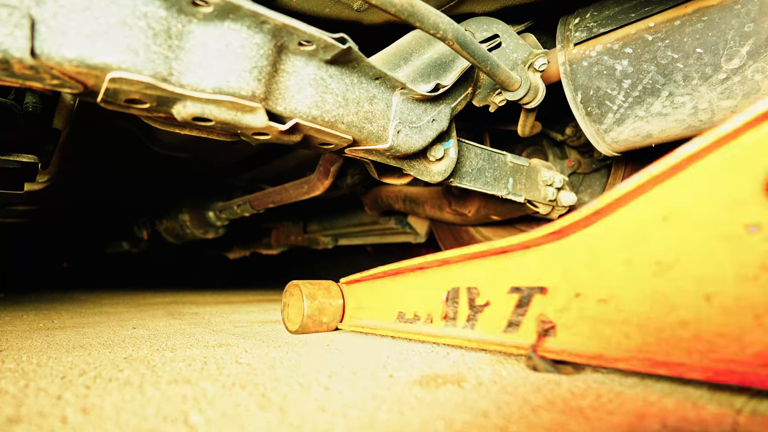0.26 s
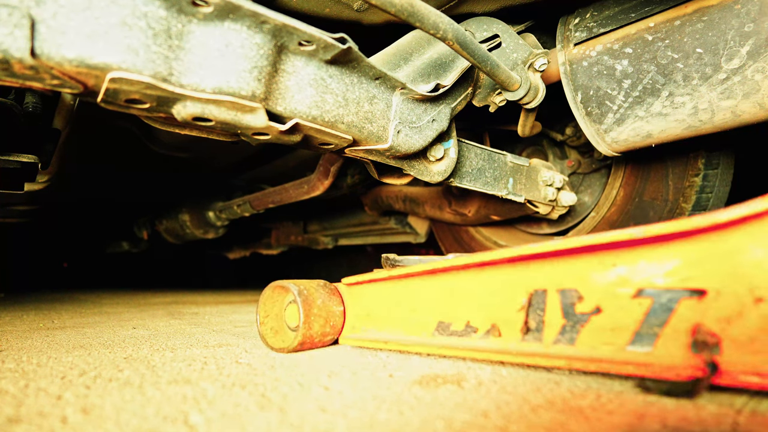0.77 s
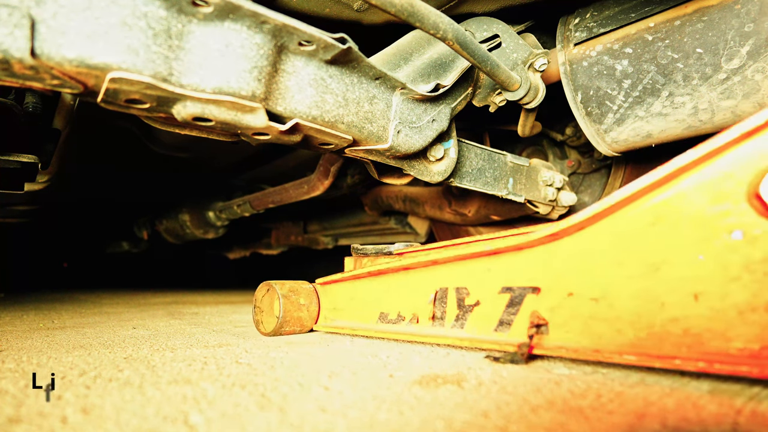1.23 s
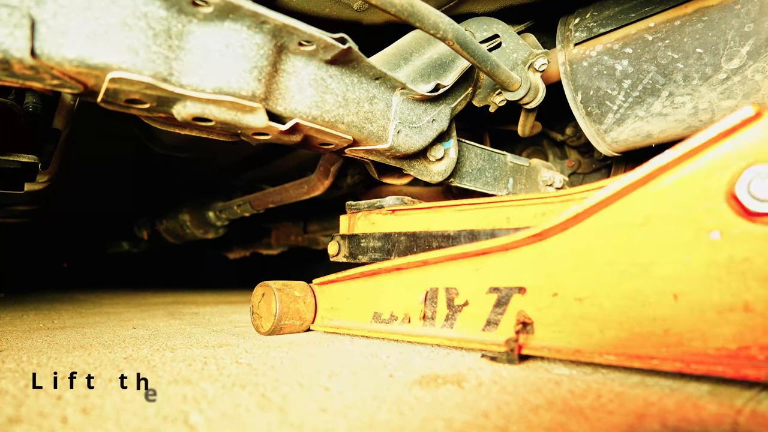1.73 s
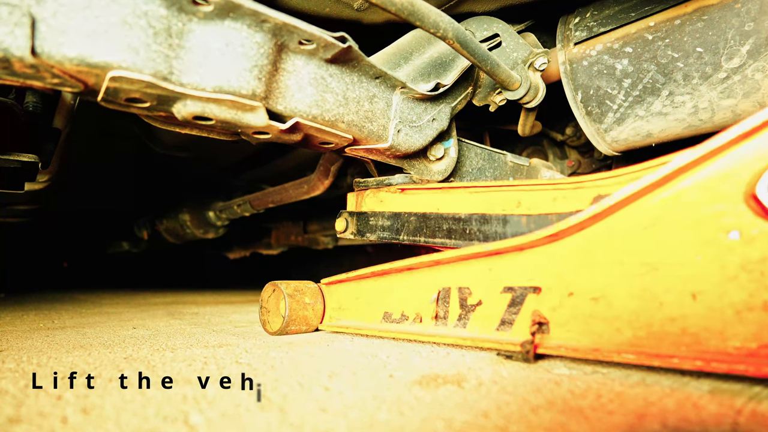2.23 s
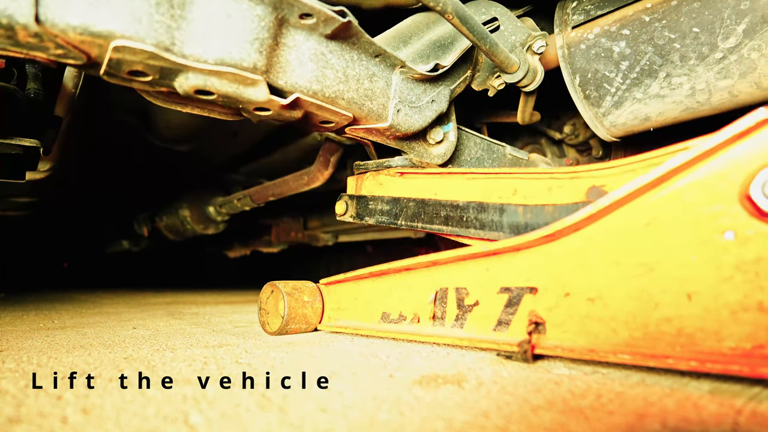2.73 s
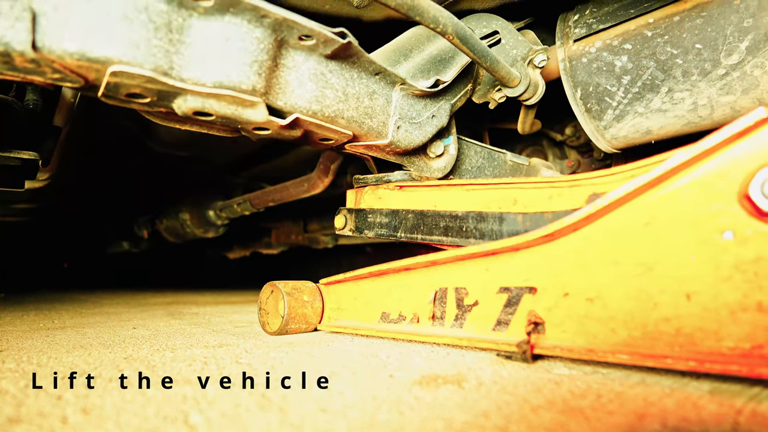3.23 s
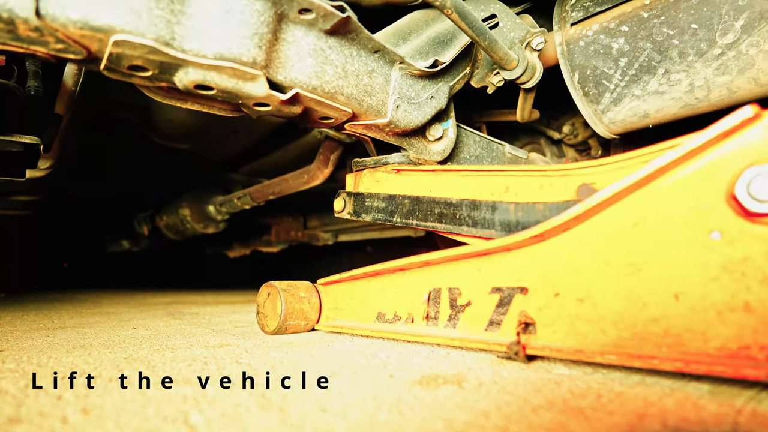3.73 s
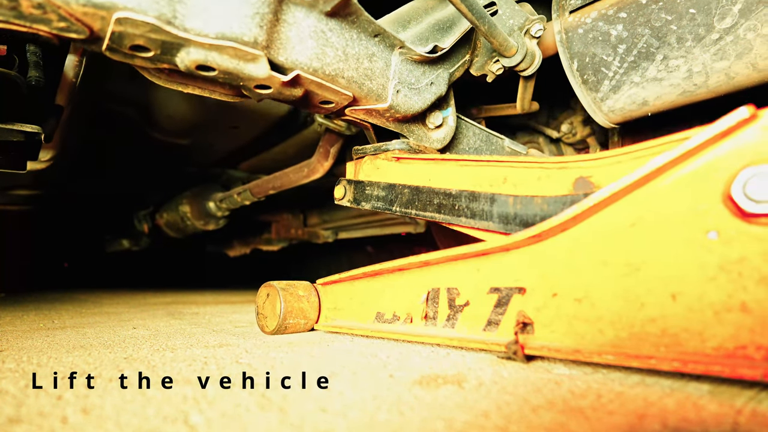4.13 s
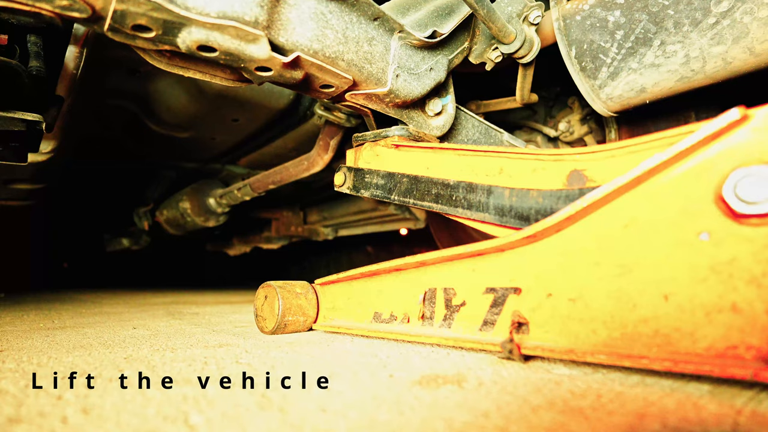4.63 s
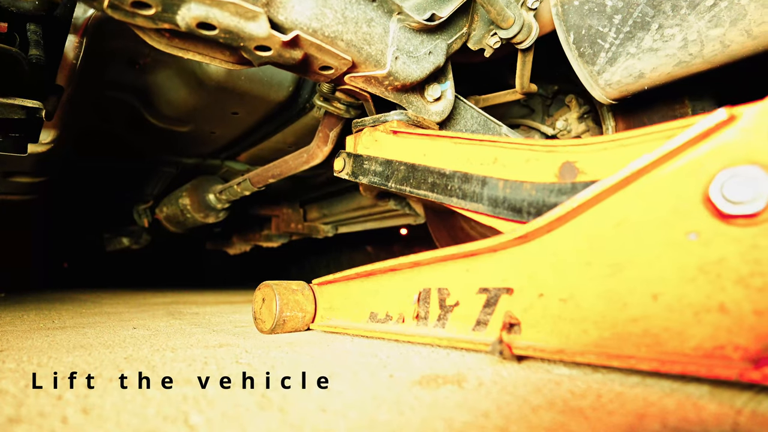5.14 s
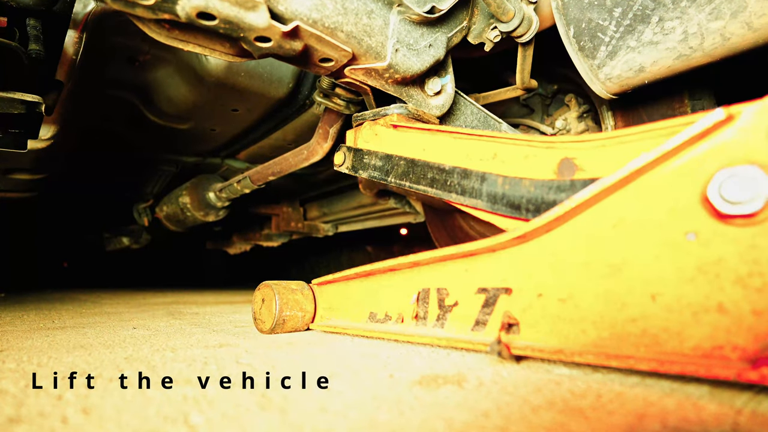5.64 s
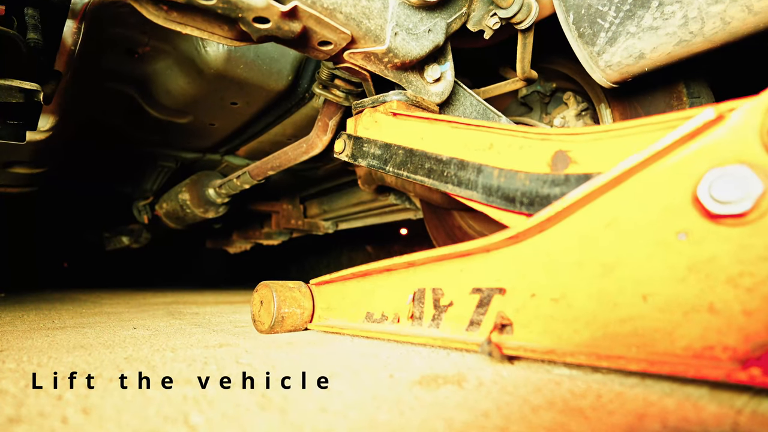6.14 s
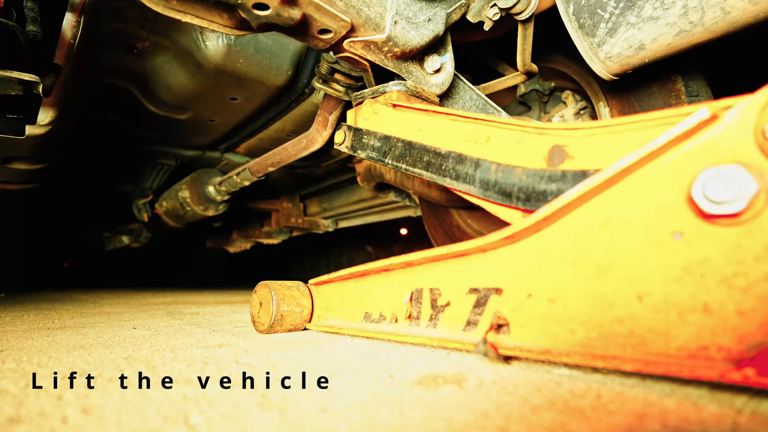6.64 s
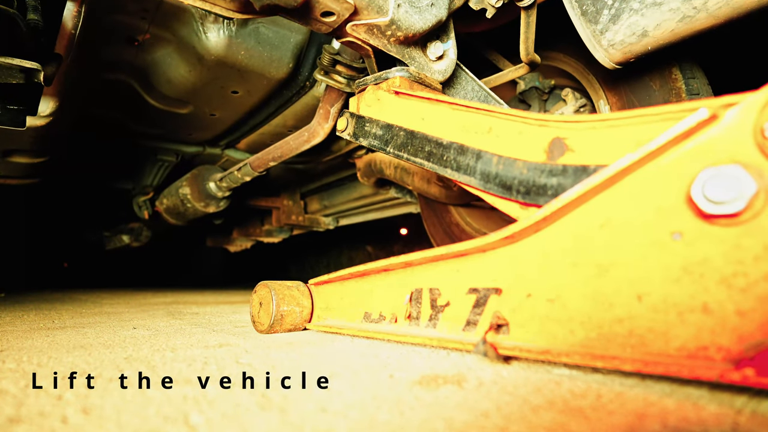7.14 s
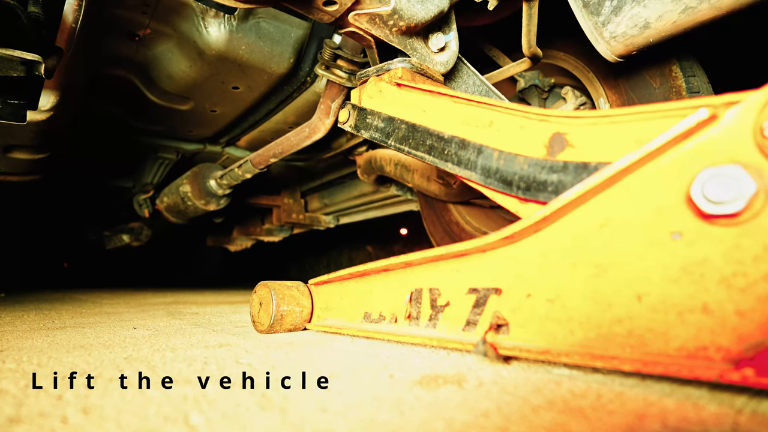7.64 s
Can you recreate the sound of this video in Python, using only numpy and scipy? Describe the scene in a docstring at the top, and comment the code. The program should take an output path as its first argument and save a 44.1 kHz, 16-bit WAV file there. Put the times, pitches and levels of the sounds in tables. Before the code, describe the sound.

Sped-up jack work: loud metallic rattling and jingling, low thumps, then quick rhythmic handle knocks with hissing oil and one sharp shriek.

```python
"""Floor jack dragged and pumped, sped up

A steel jack clatters over concrete under a car (struck resonances), then is pumped; all of it is heard
in sped-up playback with pitch preserved. Stroke: knock of the handle, its edges softened by that
playback, oil hiss (shaped noise); some seal squeals (stick-slip tones). The frame thumps on the floor
(slab modes); far traffic rumbles (noise) and drones (gliding tones). Two microphone ports sit close by.
"""
import sys
import numpy as np
from scipy import signal
from scipy.fft import rfft, irfft, next_fast_len
from scipy.io import wavfile
from scipy.ndimage import uniform_filter1d

SR = 44100
rng = np.random.default_rng(int(sys.argv[2]) if len(sys.argv) > 2 else 0)


def gain_from_db(level_db):
    """Turn a decibel level (scalar or array-like) into a linear amplitude factor."""
    decades = np.asarray(level_db, float) / 20
    return 10 ** decades


def generate_wav(signal):
    """Clip the signal to [-1, 1] and save it as 16-bit WAV at the path in sys.argv[1]."""
    frames = np.transpose(np.atleast_2d(signal))
    scaled = np.clip(frames, -1, 1) * 32767
    pcm = np.round(scaled).astype(np.int16)
    wavfile.write(sys.argv[1], SR, pcm)


N = 347508
PATHS = 3  # shared, left only, right only


def along(points, hz):
    """Interpolates (f/Hz, value) points on a log frequency axis."""
    f, value = np.transpose(points)
    return np.interp(np.log(hz + 1), np.log(f + 1), value)


def curves(rows):
    """One value per sample for each column after the time."""
    t_s, *columns = np.transpose(rows)
    return [np.interp(np.arange(N) / SR, t_s, c) for c in columns]


def wobble(knots_per_s):
    """Random curve: normal knots joined by straight lines."""
    knots = rng.standard_normal(4000)
    return np.interp(np.arange(N) * knots_per_s / SR, np.arange(len(knots)), knots)


def modes(table):
    """Causal response of parallel resonances, alternating in sign."""
    def response(f):
        total = 0
        for k, (centre, width, db) in enumerate(table):
            damping = 1j * f * width
            total = total + (-1) ** k * gain_from_db(db) * damping / (centre * centre - f * f + damping)
        return total
    return response


def colour(points):
    """Smooth zero-phase response from a spectrum."""
    return lambda f: gain_from_db(along(points, f))


def swells(t_s, rise_ms, fall_ms, db, front=1.7, back=1.174):
    """Soft-edged bursts, 6 dB down one rise before and one fall after the peak; powers add."""
    grid_ms = np.arange(0, 1000 * N / SR, 0.5)
    after_ms = grid_ms - 1000 * np.c_[t_s]
    rising = abs(after_ms / np.c_[rise_ms]) ** front
    falling = abs(after_ms / np.c_[fall_ms]) ** back
    edge = np.where(after_ms < 0, rising, falling)
    bursts = gain_from_db(np.c_[db] - 6 * edge.clip(0, 40))
    level = np.sqrt(np.sum(bursts ** 2, axis=0))
    return np.interp(np.arange(N) * 1000 / SR, grid_ms, level)


def blows(t_s, db):
    """One-sample hard contacts, the same on all paths."""
    return np.bincount(np.round(t_s * SR).astype(int), gain_from_db(db), N)


def chatter(level, grit_db, rate=300, patchy_db=3.5):
    """Noise under an envelope, with random time-frequency patches like the streaks of sped-up playback."""
    noise = rng.standard_normal((PATHS, N), dtype=np.float32)
    z = signal.stft(noise, nperseg=512)[2]
    field = rng.standard_normal(z.shape[1:], dtype=np.float32)
    field = uniform_filter1d(field, size=3, axis=0)
    field = uniform_filter1d(field, size=7, axis=1)
    patches = gain_from_db(patchy_db * field / field.std())
    noise = signal.istft(z * patches, nperseg=512)[1][:, :N]
    return level * gain_from_db(grit_db * wobble(rate)) * noise


# Left minus right: f/Hz, level/dB
PORT_DB = [(60, 0), (150, -1), (380, -1), (950, -9), (2380, -4.5), (5980, -8), (15000, -13.5)]
# Left leads right: f/Hz, phase/rad
PORT_LEAD = [(30, 0), (600, 1.07), (2150, 1.5), (3360, 4.5), (4130, 4), (4910, 7), (16000, 7.5)]
# Incoherent power of each port: f/Hz, share
PORT_OWN = [(60, 0.09), (400, 0.07), (1000, 0.58), (4000, 0.75), (15000, 0.18)]


def heard(drive, response, band_hz):
    """Drive through a body to both ports; unit white noise gives their mean rms 1 in the band."""
    m = next_fast_len(N + SR // 2)
    hz = np.fft.rfftfreq(m, 1 / SR)
    half = along(PORT_DB, hz) / 2 * np.log(10) / 20 + 0.5j * along(PORT_LEAD, hz)
    ports = response(hz) * np.exp([half, -half])
    own = np.clip(along(PORT_OWN, hz), 0, 1)
    power = (1 - own) * abs(ports.mean(0)) ** 2 + own * (abs(ports) ** 2).mean(0) / 2
    in_band = (hz > band_hz[0]) * (hz < band_hz[1])
    size = np.sqrt(np.mean(power * in_band))
    z = rfft(drive, m)
    paths = np.sqrt(1 - own) * z[0] + np.sqrt(own) * z[1:]
    return irfft(ports * paths / size, m)[:, :N]


# Strokes: knock t/s, flow middle delay/ms, flow length scale/ms, then drive level/dB of knock, oil, thump
PUMP = [(3.295, 14, 22, -62, -96, -52.5), (3.419, 14, 19, -53, -79, -49.5),
        (3.558, 20, 27, -56, -63.5, -50), (3.699, 8, 21, -52.5, -59, -51), (3.836, 16, 23, -52, -60.5, -55),
        (3.978, 26, 35, -51, -61.5, -59.5), (4.127, 18, 24, -80, -59.5, -55.5),
        (4.27, 17, 22, -63, -57.5, -54.5), (4.425, 16, 22, -49, -57.5, -55),
        (4.562, 25, 23, -61.5, -59, -55), (4.706, 23, 23, -46, -62, -58), (4.852, 19, 22, -61, -63.5, -51),
        (5.007, 22, 31, -58.5, -65, -49), (5.165, 31, 32, -54, -68.5, -58.5),
        (5.815, 27, 26, -60.5, -71, -61), (5.99, 22, 26, -62.5, -66, -60.5),
        (6.15, 32, 30, -43.5, -68, -60.5), (6.331, 40, 24, -50.5, -74.5, -60.5),
        (6.532, 32, 24, -59.5, -70.5, -61.5), (6.728, 40, 18, -52, -69.5, -64.5),
        (6.938, 30, 19, -57, -67.5, -60), (7.132, 49, 17, -57.5, -71, -61),
        (7.368, 40, 21.2, -68, -70.5, -65.5), (7.579, 33, 19, -62.5, -70, -61),
        (7.793, 35, 21, -62.5, -73, -65)]
# Drift as the arm rises: t/s, fine hiss re oil/dB, end-stop knock drive/dB, end-stop thump drive/dB
LIFT = [(3.3, 7, -69.5, -69), (3.601, 0, -76, -65.5), (4.4, -2, -68, -64), (4.9, -8, -62, -57.5),
        (5.099, 1.5, -70, -69), (6, 2.5, -71, -63.5), (6.399, 7.5, -75.5, -65), (6.8, 2, -65, -57),
        (7.199, -0.5, -75, -66.5), (7.8, 1, -67.5, -64)]


def pump():
    """Stroke timing: flow middle, end stop after the flow, and levels drifting with the lift."""
    t_s, late_ms, width_ms = np.transpose(PUMP)[:3]
    at_s, *drift = np.transpose(LIFT)
    fine_db, stop_db, stop_thump_db = (np.interp(t_s, at_s, c) for c in drift)
    middle_s = t_s + late_ms / 1000
    stop_s = middle_s + (width_ms + 13) / 1000
    return middle_s, stop_s, fine_db, stop_db, stop_thump_db


# Background: t/s, rumble level/dB, ambience level/dB (before wobble)
BACKGROUND = [(0, -68, -74.5), (.6, -70, -85), (1.3, -66, -79.5), (2.4, -64.5, -84.5), (3, -66, -87.5),
              (4.5, -65.5, -79), (5.4, -67.5, -83.5), (7.88, -73.5, -86.5)]
# Rumble spectrum: f/Hz, relative level/dB per Hz
TRAFFIC = [(15, -35), (30, -8), (70, 0.5), (124, 0), (180, -14), (240, -10.5), (300, -29), (520, -67)]


def traffic():
    """Far traffic: slowly wavering low noise."""
    rumble_db, _ = curves(BACKGROUND)
    drive = chatter(gain_from_db(rumble_db), grit_db=2.5, rate=11, patchy_db=0.5)
    return heard(drive, colour(TRAFFIC), (30, 300))


# Ambience spectrum: f/Hz, relative level/dB per Hz
AMBIENCE = [(150, -41), (250, -8.5), (420, -19), (1100, -20), (2500, -28), (5500, -37), (10100, -38),
            (15800, -32.5)]


def ambience():
    """Faint wideband noise, slowly wavering."""
    _, air_db = curves(BACKGROUND)
    drive = chatter(gain_from_db(air_db), grit_db=3.5, rate=12, patchy_db=3.5)
    return heard(drive, colour(AMBIENCE), (500, 15000))


# Far engine, one list per tone: t/s, f/Hz, level/dB (before wobble)
DRONES = [
    [(1.4, 246, -87), (1.6, 246, -71), (1.95, 250, -74.5), (2.1, 233, -68.5), (2.35, 240, -71.5),
     (2.6, 238.5, -70.5), (3, 229.5, -85.5)],
    [(2.1, 140, -65), (2.3, 146.5, -69), (2.42, 148.7, -52), (2.62, 144.6, -67.5), (2.85, 135.7, -62.5),
     (3, 126.6, -78.5)],
    [(1.9, 95, -71), (2.05, 95.44, -64), (2.24, 99.4, -60), (2.35, 92, -88)],
]


def drones():
    """Gliding engine tones, silent outside their tables; one shared wave drives both ports."""
    wave, t_s = np.zeros(N), np.arange(N) / SR
    for rows in DRONES:
        hz, db = curves(rows)
        inside = (t_s > rows[0][0]) & (t_s < rows[-1][0])
        level = inside * gain_from_db(db + 2.0 * wobble(13)) * np.sqrt(2)
        phase = 2 * np.pi * np.cumsum(hz + 1.5 * wobble(3.0)) / SR
        wave += level * np.sin(phase)
    return heard(np.array([wave] * PATHS), np.ones_like, (0, SR))


# Weight landing on the floor: t/s, length scale/ms, drive level/dB
THUMPS = [(0.226, 55, -60.5), (0.43, 64, -59.5), (2.251, 15, -45.5), (2.386, 10.5, -47), (2.456, 38, -51),
          (2.552, 14, -48.5), (2.641, 16, -49), (2.75, 19, -54), (3.348, 16, -53)]
# Floor modes: f/Hz, width/Hz, level/dB
SLAB = [(80, 54.4, 4.08), (108, 98.4, 0.85)]


def thumps():
    """Landings, strokes and end stops shake the slab's low modes."""
    t_s, width_ms, db = np.transpose(THUMPS)
    start_s, *_, thump_db = np.transpose(PUMP)
    _, stop_s, _, _, stop_thump_db = pump()
    t_s = np.r_[t_s, start_s + 0.0032, stop_s]
    db = np.r_[db, thump_db, stop_thump_db]
    width_ms = np.r_[width_ms, np.full(2 * len(PUMP), 14)]
    level = swells(t_s, 0.6 * width_ms, 0.72 * width_ms, db)
    return heard(chatter(level, grit_db=2.2, patchy_db=-0.5), modes(SLAB), (50, 200))


# Unloaded strokes scraping: middle t/s, length scale/ms, drive level/dB
SCRAPES = [(2.427, 21, -58), (2.599, 29, -59), (2.788, 22.6, -57.5), (3.085, 28, -73.5), (5.589, 87, -72)]
# Hollow frame modes: f/Hz, width/Hz, level/dB
HOLLOW = [(760, 81, -2.5), (1700, 130, 1), (2370, 150, -2), (3210, 330, -2.5), (4140, 310, -3),
          (5350, 490, -4.5), (6520, 91, -8)]


def scrapes():
    """Strokes with no load behind them scrape: friction noise through the hollow frame's modes."""
    t_s, width_ms, db = np.transpose(SCRAPES)
    level = swells(t_s, width_ms, 0.82 * width_ms, db, front=4.7, back=3.9)
    drag = chatter(level, grit_db=0.5, rate=29, patchy_db=1.0)
    return heard(drag, modes(HOLLOW), (2800, 8000))


# Wheels and frame: t/s, length scale/ms, rattle drive/dB, boom re rattle/dB, jingle re rattle/dB
CLATTER = [(0.025, 14.6, -52.5, -2, -8.5), (0.055, 8.1, -41, -18, -14.5), (0.157, 15, -60, -6.5, -10.5),
           (0.212, 5.5, -47.5, -9.5, -3), (0.237, 11.7, -49.5, -6, 0), (0.285, 11, -53, -18, -10),
           (0.318, 9.8, -47, -6.5, -9), (0.354, 5.3, -35, -23.5, -22), (0.368, 5.8, -41.5, -5.5, -1.5),
           (0.388, 8.8, -33.5, -8.5, -1.5), (0.429, 4.7, -46.5, -10, -20.5),
           (0.473, 14.5, -49.5, -10.5, -9), (0.564, 12, -68, -13, 3), (0.67, 8, -83.5, -11, 9),
           (0.812, 17, -68.5, -11, 2.5), (0.857, 11.2, -43, -10.5, 3.5), (0.887, 11.3, -42.5, -8, -12.5),
           (0.982, 11.5, -59.5, 7.5, 1.5), (1.09, 6, -55, -14.5, -11), (1.107, 6, -49, -1.5, -6),
           (1.127, 8.6, -30.5, -11.5, -10), (1.148, 12.3, -39.5, -9, -8.5), (1.204, 5.2, -52.5, -29, -1.5),
           (1.235, 4.7, -65.5, -24, 6), (1.264, 6.3, -58.5, -13, -4.5), (1.316, 10, -59, -21, -7.5),
           (1.368, 8.7, -52, -15, -11.5), (1.412, 7, -57.5, -6.5, -12.5), (1.49, 6.6, -56.5, -12, -9),
           (1.533, 5, -59.5, -17, -11), (1.604, 4.2, -54, -10.5, -7), (1.655, 3.4, -66, 1, -6),
           (1.735, 4.3, -57, -7, -8), (1.798, 17, -58, 0.5, 3), (1.888, 12.7, -57, -3, 0.5),
           (2.006, 3.1, -62, -5, 8.5), (2.137, 7.7, -58, -4.5, -4), (2.192, 4.4, -64.5, -3.5, 3),
           (2.255, 10, -66, -1, -1), (2.276, 8.6, -59.5, -11, -13)]
# Low frame modes: f/Hz, width/Hz, level/dB
FRAME = [(391, 54.3, 3.5), (278, 190, -15)]
# Side plate modes: f/Hz, width/Hz, level/dB
PLATES = [(957, 260, -5), (1177, 60, 6.5), (1450, 340, -1.5), (1779, 73, 5.5), (2000, 360, -1.5),
          (2620, 720, -1.5), (4210, 1600, -10)]
# Loose pin modes: f/Hz, width/Hz, level/dB
PINS = [(4270, 170, -8), (5450, 1600, -10), (6540, 630, -3), (9800, 2600, -11), (12130, 270, 0.5),
        (13000, 790, -7.5), (13800, 700, 1.5), (15400, 610, -7.5)]
# Lightly damped steel modes: f/Hz, width/Hz, level/dB
RINGS = [(1150, 31, 9), (1770, 14, 3), (4880, 47, 4), (6440, 23, 1.5), (12010, 41, -1.5), (14200, 26, -4)]


def clatter():
    """Impacts excite frame, plates and loose pins; narrow steel modes ring on."""
    t_s, width_ms, db, boom_db, jingle_db = np.transpose(CLATTER)
    # loose parts tick at random while the jack settles
    count = 22
    chance = rng.random((count, 2))
    t_s = np.r_[t_s, 1 + 1.5 * chance[:, 0]]
    db = np.r_[db, -69.5 - 2 * np.log(chance[:, 1] + 1e-2)]
    width_ms = np.r_[width_ms, np.full(count, 3.8)]
    boom_db = np.r_[boom_db, np.full(count, -15)]
    jingle_db = np.r_[jingle_db, np.full(count, -12)]
    rise_ms, fall_ms = 1.18 * width_ms, 0.91 * width_ms

    boom = chatter(swells(t_s, rise_ms, fall_ms, db + boom_db - 4.5), grit_db=2.5, patchy_db=0.5)
    boom = boom + blows(t_s - 0.4 * width_ms / 1000, db + boom_db + 20.5)
    boom = heard(boom, modes(FRAME), (280, 520))

    rattle = chatter(swells(t_s, rise_ms, fall_ms, db), grit_db=3.5, rate=450, patchy_db=2.5)
    rattle = heard(rattle + blows(t_s, db + 16), modes(PLATES), (700, 3200))

    shake = swells(t_s, 0.98 * rise_ms, fall_ms, db + jingle_db, front=2.1, back=1.25)
    jingle = heard(chatter(shake, grit_db=1.5, rate=500, patchy_db=5.5), modes(PINS), (4000, 15500))
    rings = heard(chatter(shake, grit_db=2.5, patchy_db=5.5), modes(RINGS), (1000, 15500))
    return gain_from_db(3.0) * boom + gain_from_db(-4.0) * rattle + gain_from_db(-5.0) * jingle + gain_from_db(-13.5) * rings


def slip(hz, level, partials, rasp_db):
    """Stick-slip tone: steadier fundamental, overtones rasping in level and phase."""
    turn = 2 * np.pi * np.cumsum(hz) / SR
    overtones = np.zeros(N)
    for multiple, db in partials:
        rasp = gain_from_db(db + rasp_db * wobble(410))
        overtones += rasp * np.sin(multiple * (turn + 0.22 * wobble(400)))
    fundamental = gain_from_db(2.5 * wobble(110)) * np.sin(turn)
    return np.array([np.sqrt(2) * level * (fundamental + overtones)]).repeat(PATHS, axis=0)


# Seal squeals: middle t/s, half length/ms, first f/Hz, last f/Hz, level/dB (before falter and wobble)
SQUEALS = [(4.01, 21.5, 1589, 1700, -43.5), (4.157, 15, 1608, 1724, -47.5), (4.298, 17.3, 1581, 1688, -46),
           (4.451, 18, 1603, 1565, -51), (4.594, 15.5, 1573, 1527, -49.5), (4.739, 16, 1554, 1514, -50.5)]
# Squeal overtones: multiple of f, level re fundamental/dB (before wobble)
SQUEAL_PARTIALS = [(2, -16), (3, -21.5)]
# Ram modes rasped by the seal: f/Hz, width/Hz, level/dB
RAM = [(3180, 180, 1.5), (4870, 220, 5), (6500, 180, -6.5), (7900, 230, -6.5)]


def squeals():
    """The ram seal sticks and slips, faltering and stepping in pitch midway, and rasps the ram."""
    t_s, half_ms, first_hz, last_hz, db = np.transpose(SQUEALS)
    knots_s = np.ravel([t_s - 0.0075, t_s + 0.0075], "F")
    hz = np.interp(np.arange(N) / SR, knots_s, np.ravel([first_hz, last_hz], "F"))
    level = swells(t_s, half_ms, half_ms, db, front=4.5, back=3.6)
    count = len(t_s)
    dip = swells(t_s, np.full(count, 3.5), np.full(count, 3.5), np.full(count, -4.5))
    falter = 1 - np.clip(dip, 0, 1)
    squeal = slip(hz, level * falter, SQUEAL_PARTIALS, rasp_db=5.0)
    rasp = chatter(gain_from_db(-20.5) * level, grit_db=4.5, patchy_db=1)
    return heard(squeal, np.ones_like, (0, SR)) + heard(rasp, modes(RAM), (2800, 8500))


# Seal shriek: t/s, rise/ms, fall/ms, f/Hz, level/dB (before wobble)
SHRIEK = [(3.87, 6.487, 5.3, 2064, -21.5)]
# Shriek partials: multiple of f, level re fundamental/dB (before wobble)
SHRIEK_PARTIALS = [(.55, -32.5), (1.5, -28), (2, -29), (2.5, -34.5), (2.999, -34.5), (4, -31.5), (5, -31),
                   (6.5, -30.5), (7, -29.5)]
# Steel part left ringing: f/Hz, width/Hz, level/dB
SHRIEK_RINGS = [(4160, 24, 5)]


def shriek():
    """The seal shrieks once, slipping on every second cycle, and leaves a steel part ringing."""
    t_s, rise_ms, fall_ms, hz, db = np.transpose(SHRIEK)
    level = swells(t_s, rise_ms, fall_ms, db, front=1.7, back=2.2)
    tone = slip(hz.repeat(N), level, SHRIEK_PARTIALS, rasp_db=4.0)
    struck = modes(SHRIEK_RINGS)
    return heard(tone, lambda f: 1 + struck(f), (0, SR))


# Knocks outside the stroke pattern: t/s, drive level/dB, dull part re knock/dB
KNOCKS = [(2.384, -60, -5), (2.743, -61, -16), (4.891, -49, 8), (5.03, -72, 11), (7.18, -80, 10),
          (7.42, -78, 8.5), (7.6, -75, 5.5)]
# Linkage modes: f/Hz, width/Hz, level/dB
LINKAGE = [(780, 60, -2.5), (1190, 130, -2), (1334, 180, -2.5), (1780, 380, -4.5), (2326, 180, -1.5)]
# Handle modes: f/Hz, width/Hz, level/dB
HANDLE = [(225, 51, -4.5), (548, 95, 3.5), (788, 63, -7)]


def knocks():
    """The handle takes up slack, then meets its stop: linkage rings, handle answers dully, longer."""
    start_s, _, _, knock_db, _, thump_db = np.transpose(PUMP)
    _, stop_s, _, stop_db, stop_thump_db = pump()
    loose_s, loose_db, loose_dull_db = np.transpose(KNOCKS)
    t_s = np.r_[start_s, stop_s, loose_s]
    db = np.r_[knock_db, stop_db, loose_db]
    dull_db = np.r_[thump_db - 11, stop_thump_db - 8, loose_db + loose_dull_db]
    width_ms = np.clip(6.5 + 0.23 * (-54.5 - db), 2, 20)  # weak knocks are longer

    level = swells(t_s, 1.13 * width_ms, 0.73 * width_ms, db - 1.5, front=2.1)
    ring = chatter(level, grit_db=3.3, patchy_db=2.0) + blows(t_s, db + 13)
    ring = heard(ring, modes(LINKAGE), (600, 2600))

    dull_level = swells(t_s, 0.51 * width_ms, 1.1 * width_ms, dull_db - 5)
    dull = chatter(dull_level, grit_db=2.0, patchy_db=-1.0) + blows(t_s - 0.002, dull_db + 18)
    dull = heard(dull, modes(HANDLE), (200, 900))
    return gain_from_db(-1.0) * ring + gain_from_db(2) * dull


# Short ticks and hisses: t/s, length scale/ms, drive level/dB, fine hiss re tick/dB
TICKS = [(2.387, 7, -65, 7), (2.549, 5.1, -66.5, 5.5), (2.736, 4.2, -65.5, 11.5), (2.89, 11, -87, 9),
         (3.18, 11, -89, 4), (3.262, 9.6, -98, 13), (3.296, 4.3, -70.5, 13), (3.33, 8.8, -87, 10),
         (3.37, 8.5, -79.5, 15.5), (3.498, 6.8, -85.5, 13.5), (3.864, 8, -52.5, 4), (4.36, 6.7, -78.5, 9),
         (4.495, 10, -71.5, 8.5), (4.809, 13, -74, 0.5), (4.893, 5.7, -60.5, -9.5), (4.968, 7, -74.5, -6),
         (5.011, 8, -59.5, -18), (5.077, 6, -68, -2.5), (5.285, 7, -74, -15), (5.315, 6.6, -73.5, -7.5),
         (5.36, 7.9, -76, -4), (5.424, 7.8, -75, -8.5), (5.683, 7, -71.5, -7), (5.725, 7, -77, -17),
         (5.765, 7.7, -76.5, -11.5), (5.93, 7.3, -73, 2.5), (6.81, 9.7, -70.5, -13),
         (7.014, 3.3, -70.5, 4.5), (7.36, 3.6, -84, 9), (7.572, 4.6, -82, 9.5)]
# Oil spectrum: f/Hz, relative level/dB per Hz
OIL = [(350, -24.5), (600, -11), (1160, -9), (1660, 0), (2900, -4.5), (3320, -3), (9000, -12.5),
       (11700, -41.5), (19800, -120)]
# Fine hiss spectrum: f/Hz, relative level/dB per Hz
FINE = [(4120, -35.5), (7000, -9.5), (11100, -5.5), (12000, -6.5), (14100, 3.5), (15800, -7.5)]


def strokes():
    """Oil forced past the valve; fine hiss starts sharply with the push, returns weakly on the upstroke."""
    _, _, flow_ms, _, oil_db, _ = np.transpose(PUMP)
    middle_s, _, flow_fine_db, _, _ = pump()
    tick_s, tick_ms, tick_db, tick_fine_db = np.transpose(TICKS)
    t_s, width_ms = np.r_[middle_s, tick_s], np.r_[flow_ms, tick_ms]
    db = np.r_[oil_db, tick_db]
    hiss_db = db + np.r_[flow_fine_db, tick_fine_db]

    flow = swells(t_s, 0.99 * width_ms, 0.98 * width_ms, db, front=3.5, back=2.5)
    oil = heard(chatter(flow, grit_db=2.5), colour(OIL), (2800, 8000))

    push_s = t_s - 0.27 * width_ms / 1000
    push = swells(push_s, 0.84 * width_ms, 1.2 * width_ms, hiss_db, front=4.8, back=2.6)
    upstroke_s = t_s + 2.4 * width_ms / 1000
    upstroke = swells(upstroke_s, 0.9 * width_ms, 0.77 * width_ms, hiss_db - 17.0)
    fine = heard(chatter(np.hypot(push, upstroke), grit_db=4.0), colour(FINE), (9000, 15500))
    return gain_from_db(-3.5) * oil + gain_from_db(-2.0) * fine


def scene():
    """Sum of all sources at the two ports."""
    jack = clatter() + knocks() + strokes() + scrapes() + squeals() + shriek()
    return jack + drones() + thumps() + traffic() + ambience()


def band_limit(x):
    """A steep low-pass at the top of the band."""
    return signal.sosfilt(signal.butter(12, 15900, fs=SR, output="sos"), x)


def record(dry):
    """Output of the finished two-port mix."""
    return band_limit(dry)


dry = scene()
out = record(dry)
generate_wav(out)
```